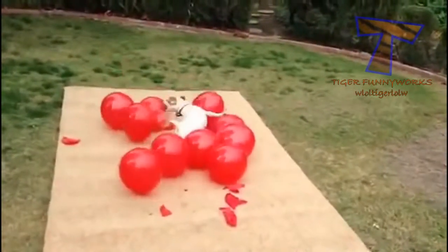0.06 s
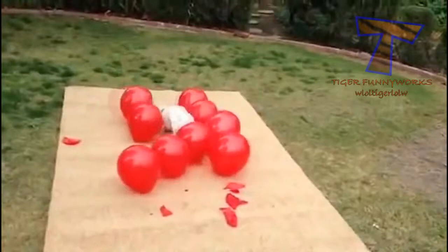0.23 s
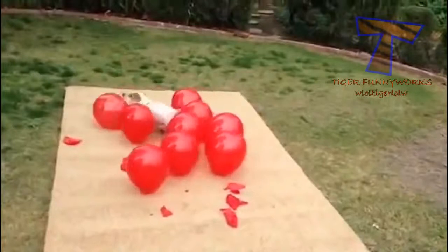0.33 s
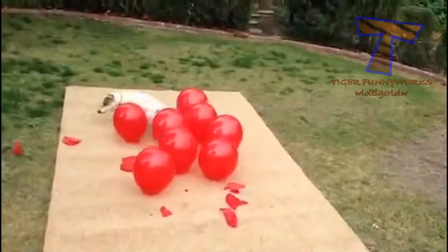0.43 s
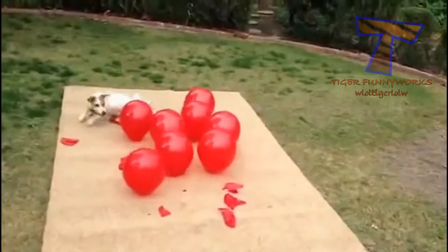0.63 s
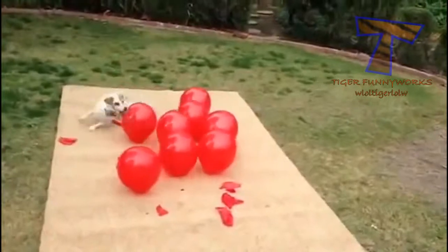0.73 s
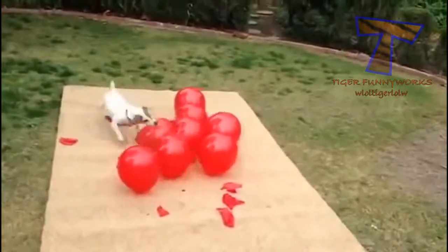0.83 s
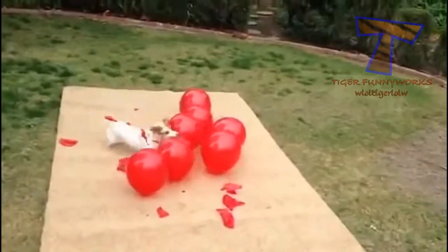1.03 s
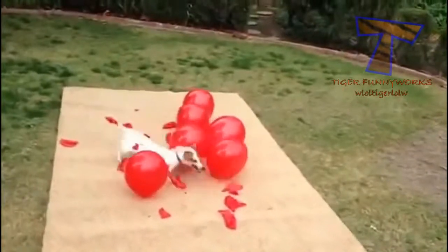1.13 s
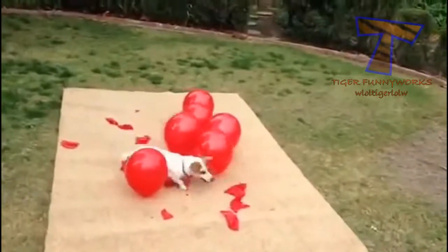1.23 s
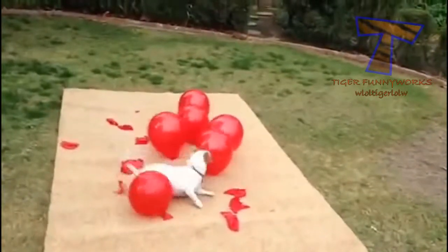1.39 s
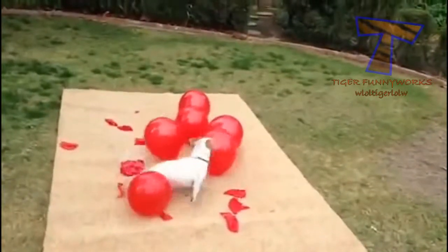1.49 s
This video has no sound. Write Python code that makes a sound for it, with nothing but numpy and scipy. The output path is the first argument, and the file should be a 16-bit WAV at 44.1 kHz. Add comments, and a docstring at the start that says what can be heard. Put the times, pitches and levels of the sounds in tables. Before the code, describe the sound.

Balloons popping: four loud, sharp bursts outdoors, with faint dog paw thuds and collar tag jingles

```python
"""Dog bursting balloons on a lawn

A small dog bursts four latex balloons on a mat. A short swell leads into each burst; the burst is a ripping
noise crack, ringing skin and damped swings of freed air. Hedge and walls return it as a rough noise wash with
one slap. Collar tags ring in damped modes, paws thud and drum, claws tick, leaves and latex rustle as shaped
noise."""
import sys
import numpy as np
from scipy import signal
from scipy.io import wavfile

SR = 44100
rng = np.random.default_rng(int(sys.argv[2]) if len(sys.argv) > 2 else 0)


def to_linear_factor(level_db):
    """Convert decibel levels (scalar or array-like) to linear amplitude factors."""
    exponent = np.asarray(level_db, float) / 20
    return 10 ** exponent


def inscribe(sig):
    """Save sig as 16-bit PCM at rate SR to the path in sys.argv[1].

    A 1-D sig is mono; a 2-D sig holds one channel per row.
    Samples are clipped to [-1, 1] before scaling.
    """
    pcm = np.round(np.clip(np.atleast_2d(sig).T, -1, 1) * 32767)
    wavfile.write(sys.argv[1], SR, pcm.astype(np.int16))


N = 68355

# Bursts: [t/s, crack level/dB, thump level/dB, thump f/Hz, boom level/dB, boom f/Hz]
BURSTS = [(0.2413, -13, 3.5, 501, 0.5, 127), (0.5497, -15, 3.5, 468, -18, 253),
          (0.8375, -15, 5, 555, -26, 214), (1.3255, -8.5, -3.5, 420, -11, 198)]
# Narrow lead-in swell before each burst: [level/dB, f/Hz, width/Hz]
LEAD_INS = [(-21.5, 2950, 610), (-27.5, 2640, 130), (-26.5, 2920, 190), (-21, 2850, 830)]
# Rings of the snapping skin, per burst: [middle level/dB, middle f/Hz, bright level/dB, bright f/Hz]
SNAPS = [(-6.5, 960, -10, 3090), (-9, 1210, -12, 4570), (-4, 1097, -8.5, 3400), (-2.5, 1153, -5.5, 4700)]
# Wall slap, per burst: [t/s, level/dB, f/Hz]
SLAPS = [(0.294, -17, 124), (0.581, -40, 460), (.872, -9, 522), (1.365, -11.5, 240)]
# Relative spectrum of tearing: [f/Hz, density/dB per Hz]
CRACK_SPECTRUM = [(880, -33), (1500, -12.5), (2460, -9.5), (3520, 0), (5830, -12), (7240, -11.5),
                  (10000, -22), (14200, -14), (14900, -30), (16000, -39)]
# Relative spectrum of the garden's return: [f/Hz, density/dB per Hz]
WASH_SPECTRUM = [(18, -36), (30, -38), (80, -4), (230, -3.5), (355, -15.5), (473, 3), (684, -10.5),
                 (1220, -6.5), (1460, -13.5), (1810, -13), (2750, -15.5), (4420, -14), (14400, -32.5),
                 (16000, -64)]
# Garden's return, per burst: [bright level/dB, low level/dB, bass level/dB]
RETURNS = [(-25, -24.5, -11), (-27.5, -23.5, -29.5), (-25.5, -19.5, -44), (-24, -24.5, -41)]
# Bass/low and low/bright limits of the return: [f/Hz]
WASH_SPLIT_HZ = [170, 900]
# Decay of the return: [f/Hz, t60/s]
WASH_T60 = [(60, 1), (300, 1), (1000, 0.53), (4000, 0.48), (9000, 0.32), (16000, 0.27)]
# Loss once near walls stop answering: [f/Hz, loss/dB]
WASH_DROP = [(60, 15), (500, 9.5), (2000, 5.5), (5000, 5.5), (12000, 7.5)]
# Touches of the collar tags: [t/s, low tag level/dB, high tag level/dB, top pair level/dB, tick level/dB]
TINKLES = [(0.063, -60, -65, -56, -66), (0.455, -55, -63, -42.5, -64), (0.691, -79, -51, -59, -71),
           (0.8, -37.5, -53, -51, -66), (.895, -47, -75, -58, -70), (1.002, -64, -48, -57, -76),
           (1.153, -58, -44, -52, -64), (1.214, -43, -52, -45, -39)]
# Tag modes, relative to the touch: [level/dB, t60/s]
TAG_MODES = [(-11, .06), (-3, 0.17), (-3.5, .24), (0, 0.09), (-5, .07)]
# Tag modes, two low, one high, top pair: [f/Hz]
TAG_HZ = [5740, 7020, 8055, 14605, 14842]
# Paw landings: [t/s, level/dB, f/Hz]
PAWS = [(0.043, -26, 172), (.113, -27.5, 194), (1.075, -35, 160), (1.122, -34, 166), (1.263, -26, 204),
        (1.522, -21, 223), (1.533, -20, 203)]
# Paws and balloons drumming on the mat: [t/s, level/dB, deepest part level/dB]
SCUFFLE = [(0.0, -39.5, -44), (0.158, -51, -57), (0.292, -31, -31), (0.428, -47.5, -67), (0.56, -33.5, -67),
           (0.702, -49, -60), (0.824, -40, -66), (0.98, -40, -81), (1.1, -60, -61.5), (1.268, -46, -43.5),
           (1.424, -35, -56), (1.55, -52, -52)]
# Teeth and claws nicking the latex: [t/s]
NICK_S = [.218, .532, .785, .817, 1.241, 1.304, 1.4805, 1.522]
# Nicks: [level/dB, low edge f/Hz, high edge f/Hz, t60/s]
NICKS = [(-51, 260, 1000, 0.006), (-26.5, 1100, 6900, 0.031), (-45.5, 1300, 1900, 0.04),
         (-22, 2880, 3490, 0.014), (-43.5, 4000, 7600, 0.0059), (-40, 1000, 4500, 0.017),
         (-36, 2300, 4600, 0.006), (-33, 260, 570, 0.043)]
# Relative spectrum of leaves and rustle: [f/Hz, density/dB per Hz]
RUSTLE_SPECTRUM = [(180, -3.5), (300, -22), (502, -11.5), (737, -8.5), (1870, -18.5), (2170, -13),
                   (3400, -24), (3700, -7.5), (6520, -31.5), (8220, -9), (9710, -12), (14800, -9),
                   (15400, -57)]
# Rustle over time: [t/s, middle level/dB, treble level/dB]
RUSTLE = [(0.0, -67, -63.5), (0.314, -40, -62), (0.456, -51, -67), (0.62, -57, -67), (0.798, -53.5, -75),
          (0.932, -50, -71), (1.118, -53.5, -75), (1.346, -54.5, -58), (1.476, -75, -83), (1.55, -50, -59)]

RIP_S, RIP_EDGE_S, RIP_T60_S, RIP_SAG_T60_S = 0.004, 0.0002, 0.01, 0.035
SWELL_S, SWELL_EDGE_S, SWELL_DB_PER_S = 0.02, 0.016, 615
SWELL_THUMP_DB, SWELL_BOOM_DB = -23, -9.5  # relative to thump and boom
LEAD_IN_TONE = 0.6  # tone gain relative to the grain
AIR_ROUGH = 0.12  # noise gain in thumps, booms and middle rings
SOFT_S = 0.0022  # rise of booms, slaps and thuds
THUMP_T60_S, THUMP_RISE_S, THUMP_LEAD_S = 0.016, 0.0025, 0.0015
BOOM_T60_S, BOOM_LEAD_CYCLES = 0.039, 0.52
SNAP_T60_S, SNAP_DELAY_S = 0.0098, 0.001423
SLAP_T60_S = 0.035
EARLIER_S, EARLIER_DB = -0.073, -30  # a burst before the start still washes out
WASH_DELAY_S, WASH_RISE_S, WASH_HOLD_S, WASH_DROP_S = 0.007, 0.0025, 0.068, 0.019
WASH_LUMPS_DB, RUSTLE_LUMPS_DB = 1.5, 3
TAG_SHIMMER, TICK_T60_S = 0.4, 0.014
PAW_T60_S = 0.063
SCUFFLE_LOW_HZ, SCUFFLE_MID_HZ, SCUFFLE_HIGH_HZ = 57, 113, 268
TREBLE_HZ = 8500
CEILING, CUTOFF_HZ = 0.97, 16400


def since(s):
    """Seconds since an event, per sample."""
    return np.arange(N) / SR - s


def rms_one(x):
    """Scale to rms 1."""
    return x / np.sqrt(np.mean(x ** 2) + 1e-20)


def at_hz(points, hz):
    """Read a table on a log-frequency axis."""
    table = np.array(points)
    return np.interp(np.log(hz), np.log(table[:, 0]), table[:, 1])


def band(low_hz, high_hz, shape=1):
    """Fresh noise band, rms 1 before shaping; shaped in time ahead of the filter."""
    sos = signal.butter(2, [low_hz, high_hz], "band", fs=SR, output="sos")
    white = rng.standard_normal(N)
    return signal.sosfilt(sos, shape * white + 1e-18) / np.std(signal.sosfilt(sos, white))


def bank(spectrum):
    """Third-octave noise bands (centre Hz, noise) whose powers add to 1."""
    edges = 25 * 2 ** np.arange(0, 9.5, 1 / 3)
    hz = np.sqrt(edges[1:] * edges[:-1])
    gain = to_linear_factor(at_hz(spectrum, hz)) * np.sqrt(hz)  # bandwidth grows with frequency
    gain = gain / np.linalg.norm(gain)
    return [(f, g * band(a, b)) for f, g, a, b in zip(hz, gain, edges, edges[1:])]


def dying(t, t60):
    """Zero before t = 0, then 60 dB down in t60."""
    return (t >= 0) * to_linear_factor(-60 * np.maximum(t, 0) / t60)


def ring(s, db, hz, t60, rough=0.0, rise=1e-4):
    """Damped swing from moment s; rough adds noise around its pitch."""
    t = since(s)
    shape = dying(t, t60) * np.clip(t / rise, 0, 1)
    swing = shape * np.sin(2 * np.pi * hz * t)
    if rough:
        swing = swing + rough * band(hz * 0.38, hz * 1.74, shape)
    return to_linear_factor(db) * swing


def lumps(db):
    """Slow random gain, a new value about every 12 ms."""
    knots = rng.standard_normal(N // 512 + 2)
    return to_linear_factor(db * np.interp(np.arange(N) / 512, np.arange(len(knots)), knots))


def balloons():
    """A narrow and low swell leads into each burst; then tearing crack, freed air, ringing skin, wall slap."""
    tearing = sum(x for _, x in bank(CRACK_SPECTRUM))
    out = 0
    for burst, lead_in, snap, slap in zip(BURSTS, LEAD_INS, SNAPS, SLAPS):
        s, crack_db, *air = burst
        out = out + to_linear_factor(crack_db) * rip_shape(since(s)) * tearing
        out = out + freed_air(s, *air) + skin_rings(s, *snap)
        out = out + swell(since(s), lead_in, *air) + wall_slap(*slap)
    return out


def rip_shape(t):
    """The skin tears for a few ms, sagging, then fades."""
    tear = np.where(t < RIP_S, 1, dying(t - RIP_S, RIP_T60_S))
    return np.clip(t / RIP_EDGE_S, 0, 1) * dying(t, RIP_SAG_T60_S) * tear


def freed_air(s, thump_db, thump_hz, boom_db, boom_hz):
    """Freed air swings as a short thump and an inverted boom, both starting early."""
    thump = ring(s - THUMP_LEAD_S, thump_db, thump_hz, THUMP_T60_S, AIR_ROUGH, THUMP_RISE_S)
    boom = ring(s - BOOM_LEAD_CYCLES / boom_hz, boom_db, boom_hz, BOOM_T60_S, AIR_ROUGH, SOFT_S)
    return thump - boom


def skin_rings(s, mid_db, mid_hz, bright_db, bright_hz):
    """Snapping skin rings at two damped pitches."""
    middle = ring(s + SNAP_DELAY_S, mid_db, mid_hz, SNAP_T60_S, rough=AIR_ROUGH)
    return middle + ring(s, bright_db, bright_hz, SNAP_T60_S, rough=0.29)


def swell(t, lead_in, thump_db, thump_hz, boom_db, boom_hz):
    """Narrow and low noise swell steeply until the burst."""
    shape = np.clip((t + SWELL_S) / SWELL_EDGE_S, 0, 1) * (t < 0)
    shape = shape * to_linear_factor(SWELL_DB_PER_S * np.minimum(t, 0))
    thump = to_linear_factor(thump_db + SWELL_THUMP_DB) * band(thump_hz * 0.5, thump_hz * 1.38, shape)
    boom = to_linear_factor(boom_db + SWELL_BOOM_DB) * band(boom_hz * 0.5, boom_hz * 2.34, shape)
    return narrow_swell(shape, *lead_in) + thump + boom


def narrow_swell(shape, db, hz, width_hz):
    """Narrow grainy noise with a steady tone at its centre."""
    grain = band(hz - width_hz / 2, hz + width_hz / 2, shape)
    tone = shape * np.sin(2 * np.pi * hz * since(0))
    return to_linear_factor(db) * (grain + LEAD_IN_TONE * tone)


def wall_slap(s, db, hz):
    """One wall returns the burst as a soft damped swing."""
    return ring(s, db, hz, SLAP_T60_S, rough=0.16, rise=SOFT_S)


def garden_wash():
    """Dense lumpy returns from hedge and walls; burst powers add, bands die separately."""
    bursts = [(EARLIER_S, [EARLIER_DB] * 3)]
    bursts += [(p[0] + WASH_DELAY_S, r[::-1]) for p, r in zip(BURSTS, RETURNS)]  # bass first
    out = 0
    for hz, noise in bank(WASH_SPECTRUM):
        part = np.searchsorted(WASH_SPLIT_HZ, hz)
        power = sum((to_linear_factor(db[part]) * wash_shape(since(s), hz)) ** 2 for s, db in bursts)
        out = out + noise * lumps(WASH_LUMPS_DB) * np.sqrt(power)
    return out


def wash_shape(t, hz):
    """Quick rise, a drop after the hold, decay by band."""
    late = np.clip((t - WASH_HOLD_S) / WASH_DROP_S, 0, 1)
    drop = to_linear_factor(-at_hz(WASH_DROP, hz) * late)
    return np.clip(t / WASH_RISE_S, 0, 1) * drop * dying(t, at_hz(WASH_T60, hz))


def tags():
    """Each touch rings the tags' modes, fluttering as they swing, and ticks."""
    out = 0
    hiss = band(3200, 17000)
    flutter = [1 + TAG_SHIMMER * band(14, 54) for _ in TAG_MODES]
    for s, low_db, high_db, top_db, tick_db in TINKLES:
        hits_db = (low_db, low_db, high_db, top_db, top_db)
        for hz, (mode_db, t60), hit_db, f in zip(TAG_HZ, TAG_MODES, hits_db, flutter):
            out = out + f * ring(s, hit_db + mode_db, hz, t60)
        out = out + to_linear_factor(tick_db) * dying(since(s), TICK_T60_S) * hiss
    return out


def paws():
    """Landings are soft damped thuds over low uneven drumming noise."""
    s, db, deep_db = np.transpose(SCUFFLE)
    drumming = to_linear_factor(np.interp(since(0), s, db)) * band(SCUFFLE_MID_HZ, SCUFFLE_HIGH_HZ)
    deep = to_linear_factor(np.interp(since(0), s, deep_db)) * band(SCUFFLE_LOW_HZ, SCUFFLE_MID_HZ)
    thuds = sum(ring(s, db, hz, PAW_T60_S, rough=0.086, rise=SOFT_S) for s, db, hz in PAWS)
    return drumming + deep + thuds


def nicks():
    """Teeth and claws on the skin: short decaying noise ticks."""
    out = 0
    for s, (db, low_hz, high_hz, t60) in zip(NICK_S, NICKS):
        out = out + to_linear_factor(db) * band(low_hz, high_hz, dying(since(s), t60))
    return out


def rustle():
    """Leaves, mat and rubbing latex: lumpy noise, middle and treble come and go."""
    s, mid_db, treble_db = np.transpose(RUSTLE)
    bands = [(hz, x * lumps(RUSTLE_LUMPS_DB)) for hz, x in bank(RUSTLE_SPECTRUM)]
    mid = rms_one(sum(x for hz, x in bands if hz < TREBLE_HZ))
    treble = rms_one(sum(x for hz, x in bands if hz >= TREBLE_HZ))
    return to_linear_factor(np.interp(since(0), s, mid_db)) * mid + to_linear_factor(np.interp(since(0), s, treble_db)) * treble


def scene():
    """All sources at one microphone."""
    return (balloons() + garden_wash() + tags() + paws() + nicks() + rustle())[None]


def top_cut(x):
    """Nothing passes above the cut-off."""
    return signal.sosfilt(signal.butter(12, 16500, fs=SR, output="sos"), x)


def record(dry):
    """Cut the top, round the peaks below the ceiling."""
    cut = signal.sosfilt(signal.cheby2(8, 40, CUTOFF_HZ, fs=SR, output="sos"), dry)
    rounded = cut / (1 + (cut / CEILING) ** 4) ** 0.25
    return top_cut(rounded)


dry = scene()
out = record(dry)
inscribe(out)
```